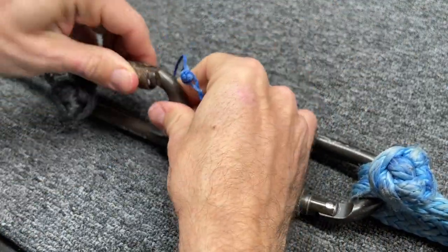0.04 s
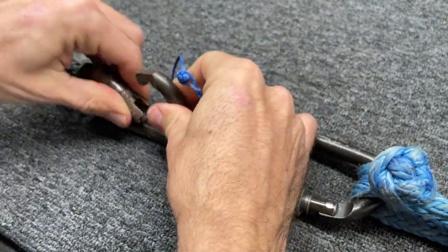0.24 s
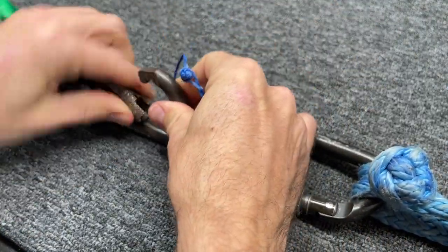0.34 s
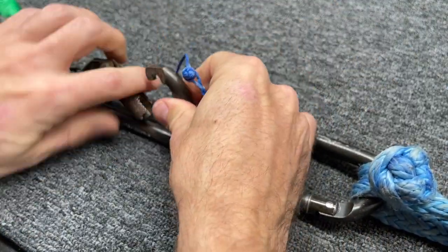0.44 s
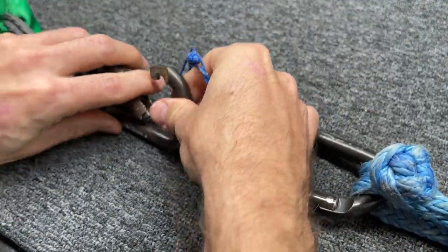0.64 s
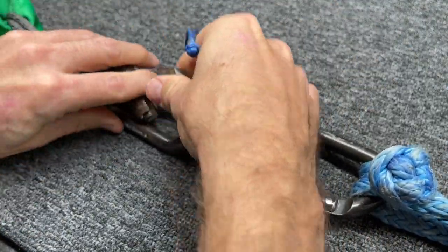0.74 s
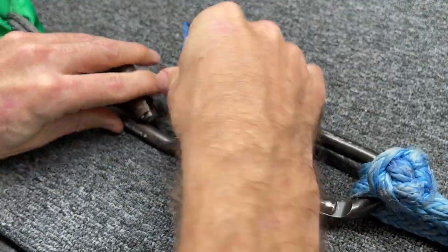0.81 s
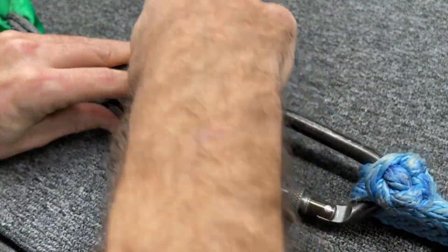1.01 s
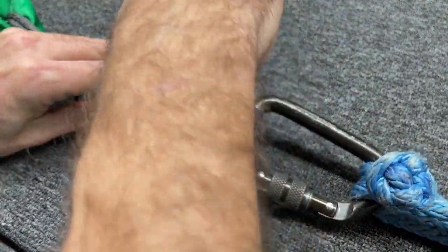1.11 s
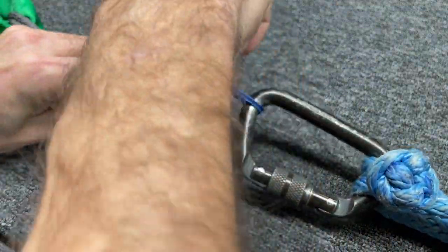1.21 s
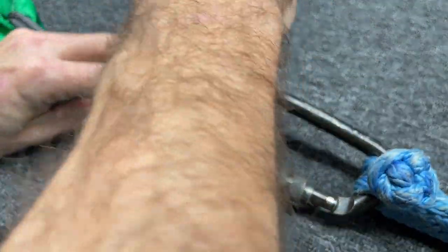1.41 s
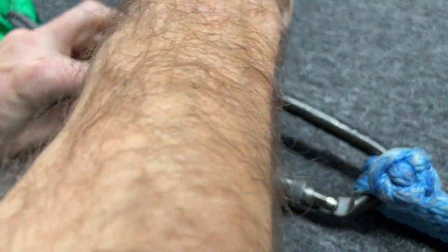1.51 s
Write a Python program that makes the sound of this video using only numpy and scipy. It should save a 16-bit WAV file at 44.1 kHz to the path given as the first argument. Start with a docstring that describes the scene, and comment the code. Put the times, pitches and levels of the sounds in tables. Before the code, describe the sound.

A steel carabiner gate snaps shut, followed by a lighter clack and soft carpet scuffing.

```python
"""A steel carabiner's sprung gate snaps shut, and a lighter clack of steel on steel follows.
Two hands work the carabiners on a carpeted floor, close to the microphone in a quiet, dead room.
The hand damps the ringing steel, and the floor thumps under each blow. Fingers, rope and metal
scuff over the carpet pile with a few tiny ticks, above a low room rumble."""
import sys
import numpy as np
from scipy import signal
from scipy.fft import rfft, irfft
from scipy.io import wavfile
from scipy.ndimage import uniform_filter1d

SR = 44100
rng = np.random.default_rng(int(sys.argv[2]) if len(sys.argv) > 2 else 0)


def dump_mix(stems):
    """Bounce the given channels to the path in sys.argv[1] as a 16-bit WAV at rate SR."""
    frames = np.atleast_2d(stems).T  # one column per channel
    limited = np.clip(frames, -1, 1)  # hard clip at full scale
    pcm = np.round(limited * 32767).astype(np.int16)
    wavfile.write(sys.argv[1], SR, pcm)


N = 68355
BIN_HZ = np.arange(N + 1) * SR / (2 * N)  # the frequencies that the filters work on
GATE_S, CLACK_S = .2105, .3498  # when the two clicks happen
CONTACT_S = .00042  # the ring builds up while the steel faces chatter
RUB_WIDTH = .44  # stereo width of the rubbing

# tone colour of the crack when steel hits steel: f/Hz, level/dB
CRACK_COLOUR = [(300, -9), (900, -6.5), (1400, -16.5), (1900, -11), (2400, -2), (3300, -7.5), (4400, 0.5),
                (5700, -6.5), (8500, 0.5), (10500, -11.5), (12500, -21), (16000, -23)]
# lighter touches have less treble than the gate: f/Hz, gain/dB
LIGHT_TOUCH = [(1000, 6), (1800, 2.5), (2850, 3), (3500, -20), (4300, -0.5), (6200, 2.5), (11000, -1.5),
               (13500, -10)]


def gate_snap():
    """The spring slams the gate shut. Returns the steel's ring and the crack of the hit."""
    # tones of the gate: f/Hz, level/dB, t60/s (t60 is the time to fade by 60 dB)
    tones = [(2228, -17.5, 0.015), (2890, -17.5, 0.007), (3740, -23, 0.0082), (4276, -13.5, .009),
             (4730, -16, .008), (6230, -19, 0.0037), (7530, -6.5, 0.0069), (8300, -29, .03),
             (8610, -25.5, .025), (9160, -32, .045), (9300, -12.5, 0.017), (11600, -21.5, 0.0033),
             (11950, -25.5, 0.017), (14600, -16, 0.0094)]
    return steel(GATE_S, tones), crack(GATE_S, db=-15.5, t60=.015)


def light_clack():
    """Steel hits steel and bounces once. Returns the ring and the double crack."""
    # tones of the clack: f/Hz, level/dB, t60/s
    tones = [(480, -45, .025), (780, -46, .012), (1535, -43.5, 0.021), (2790, -34, 0.017),
             (4350, -32, .011), (5160, -28, 0.0057), (6200, -29.5, 0.0064), (6980, -28, 0.0072),
             (7750, -26.5, .004), (8740, -16, 0.00595), (11300, -34.5, 0.0053)]
    hit = crack(CLACK_S, db=-27, t60=.007)
    bounce = crack(CLACK_S + .0014, db=-31, t60=.007)
    return steel(CLACK_S, tones), shape(hit + bounce, response(LIGHT_TOUCH))


def steel(start, tones):
    """Struck steel rings briefly in the hand; neighbouring tones swing in opposite directions."""
    return sum((-1) ** k * amp(db) * ring(start, hz, t60) for k, (hz, db, t60) in enumerate(tones))


def ring(start, hz, t60):
    """One fading tone of the steel."""
    return fade(start, CONTACT_S, t60) * np.sin(2 * np.pi * hz * since(start))


def crack(start, db, t60):
    """Steel faces chatter as they meet, making a short burst of noise."""
    envelope = fade(start, CONTACT_S, t60)
    burst = even(rng.standard_normal(N) * envelope)
    return amp(db) * coloured(burst, CRACK_COLOUR) * np.sqrt(np.mean(envelope ** 2))


def floor_thumps():
    """The floor answers each blow through the carpet; its lowest tones come last."""
    # tones of the floor: f/Hz, level/dB, t60/s, delay/s
    tones = [(54.6, -8.5, 0.25, 0.014), (91, 5.5, .075, .0085), (232.8, -7.5, 0.044, 0.0071),
             (302.4, 0.5, 0.043, .004), (352, -7, 0.029, 0.00052)]
    # blows on the floor: t/s, level/dB, pitch/ratio, gain of the upper three tones/dB
    blows = [(.126, -36.5, 1.05, -10.5), (.2109, -20.5, 1.003, 3), (0.3493, -32, 1.05, -1.5),
             (0.5759, -47, 1.03, 13.5), (0.5954, -42, 1.08, 3), (.622, -43, 1., 7.5), (1.276, -62, 1.1, 10)]
    out = np.zeros(N)
    for start, db, pitch, upper_db in blows:
        for k, (hz, tone_db, t60, delay) in enumerate(tones):
            gain = amp(db + tone_db + upper_db * (k >= 2))
            swing = np.sin(2 * np.pi * hz * pitch * since(start + delay))
            out -= gain * fade(start + delay, rise=.0037, t60=t60) * swing
    return out


def ticks():
    """Light touches of the gate and sleeve: a bright ring, a lower body ring and a tiny crack."""
    # touches: t/s, level/dB, bright ring f/Hz, t60/s, body ring f/Hz
    touches = [(.0463, -45, 9800, 0.0084, 7670), (.5744, -41, 8600, 0.012, 1280),
               (.589, -36, 8800, 0.0042, 1030), (.625, -37.5, 8240, 0.0082, 1320),
               (.9122, -49, 5700, 0.011, 2560), (1.061, -67, 5640, .018, 2300),
               (1.177, -58, 2320, .0097, 1780), (1.2758, -56, 3370, .005, 2180)]
    grit = amp(-4.5) * shape(noise(CRACK_COLOUR), response(LIGHT_TOUCH))
    out = np.zeros(N)
    for start, db, hz, t60, body_hz in touches:
        body = amp(-11) * ring(start, body_hz, t60=.025)
        out += amp(db) * (ring(start, hz, t60) + body + grit * fade(start, CONTACT_S, t60))
    return out


def lingering_ring():
    """The steel still rings faintly as the hand takes hold."""
    # faint tones: f/Hz, level/dB, t60/s
    tones = [(2980, -70, 0.24), (6220, -59.5, 0.077)]
    return steel(0, tones)


def finger_slide():
    """Fingers slide along the steel and scrape it into ringing."""
    # loudness of the slide: t/s, level/dB
    levels = [(.045, -100), (.08, -65), (.105, -53.5), (.126, -48), (.134, -60), (.15, -57.5),
              (.165, -69.5), (.205, -65), (.23, -110)]
    # its tone colour: f/Hz, level/dB
    colour = [(300, -6.5), (2600, -4.5), (6500, 0.5), (9700, 5), (10800, -7), (15500, -12), (16500, -26)]
    # pitches where the steel rings along: f/Hz, width/Hz, boost/dB
    peaks = [(1820, 630, 12.5), (3620, 360, 7), (5330, 260, 4), (8300, 670, 7.5), (12600, 800, 8.5),
             (15000, 600, 7)]
    return rub(levels, colour, flutter_db=2.5, peaks=peaks)


def squeaks():
    """Skin catches on the steel for a moment and gives a thin squeak."""
    # catches: t/s, level/dB, f/Hz, rise/s, t60/s
    catches = [(.064, -50.5, 8263, 0.0077, .22), (0.109, -48.5, 15180, 0.0028, 0.075)]
    return sum(amp(db) * np.sin(wavering_phase(hz, wobble=.02, rate=1700)) * fade(start, rise, t60)
               for start, db, hz, rise, t60 in catches)


def skin_rasp():
    """Skin sticks and slips on the steel just before letting go: a rough stack of seven tones."""
    # average loudness of each tone: t/s, level/dB
    levels = [(.09, -100), (.11, -70.5), (.127, -56), (.135, -71.5), (.19, -110)]
    phase = wavering_phase(1800, wobble=.06, rate=1500)
    return curve(levels) * sum((1 + .5 * wander(400)) * np.sin(k * phase) for k in range(1, 8))


def carpet_brush():
    """Hand and rope brush over the carpet."""
    # loudness of the brushing: t/s, level/dB
    levels = [(0, -61.5), (.026, -65.5), (.04, -73.5), (.45, -79), (.52, -61), (.555, -49.5), (.6, -55),
              (.65, -56.5), (.69, -62.5), (.77, -83.5), (.85, -82), (.92, -68.5), (.958, -68.5), (.99, -99),
              (1.175, -73), (1.21, -89), (1.55, -80.5)]
    # its tone colour: f/Hz, level/dB
    colour = [(290, -32.5), (500, -6), (655, -16), (976, -7.5), (1110, -10), (2100, -11), (5230, -9),
              (7260, -13.5), (8490, -2.5), (11300, -13), (15000, -73)]
    return rub(levels, colour, flutter_db=1.85)


def rub(levels, colour, flutter_db, peaks=()):
    """Rubbing is thousands of tiny, uneven slips a second; it swells with the speed of the hand."""
    slips_per_s, size_spread_db = 8400, .5
    body = amp(sum(db / (1 + (2 * (BIN_HZ - hz) / width) ** 2) for hz, width, db in peaks))

    def slips():
        sizes = amp(size_spread_db * np.minimum(rng.exponential(size=N), 5)) * rng.standard_normal(N)
        slipping = rng.random(N) < slips_per_s / SR
        return coloured(shape(sizes * slipping, body), colour)
    return spread(slips(), slips(), RUB_WIDTH) * curve(levels) * amp(flutter_db * wander(160))


def scuffs():
    """Short pushes of steel over the carpet, each a puff of rubbing noise."""
    # pushes: t/s, level/dB, centre f/Hz, rise/s, t60/s
    pushes = [(.574, -59.5, 610, 0.0078, 0.17), (0.621, -48.5, 543, 0.001, 0.034),
              (0.871, -63.5, 2950, 0.0054, 0.053), (0.919, -56, 386, 0.016, 0.15),
              (0.941, -63.5, 830, .006, 0.094), (1.11, -62, 500, 0.0082, 0.078),
              (1.154, -51, 1870, 0.021, 0.08), (1.2764, -56.5, 610, 0.0014, 0.026)]
    out = np.zeros(N)
    for start, db, hz, rise, t60 in pushes:
        hump = [(hz / 16, -48), (hz, 0), (hz * 16, -48)]  # falls 12 dB per octave on both sides
        out += amp(db) * noise(hump) * fade(start, rise, t60)
    return out


def carpet_drag():
    """The carabiner drags dully over the carpet, sticking and slipping as it is pushed away."""
    # loudness of the drag: t/s, level/dB
    levels = [(.05, -70), (.12, -51.5), (.19, -58), (.27, -49), (.39, -50), (.45, -62), (.56, -65),
              (.595, -47.5), (.645, -45.5), (.72, -63), (.8, -78), (1., -64), (1.33, -76)]
    # its tone colour: f/Hz, level/dB
    colour = [(30, -28.5), (52, -3), (90, 3.5), (130, -2), (160, -3.5), (190, -11), (235, -2.5),
              (320, -5.5), (420, -19.5), (700, -26), (4000, -70.5)]
    # loudness of the low stick-and-slip shudder: t/s, level/dB
    shudder_levels = [(.56, -60.5), (.595, -49), (.65, -43.5), (.675, -44.5), (.698, -35), (.725, -50),
                      (.76, -70.5)]
    scrape = noise(colour) * curve(levels)
    shudder = np.sin(wavering_phase(90, wobble=.1, rate=28)) * curve(shudder_levels)
    return scrape + shudder


def room_echo(rings):
    """Both clicks spread all round and bounce off nearby surfaces; the rings add a little colour."""
    # tone colour of the echo: f/Hz, level/dB
    colour = [(100, -3.5), (400, 2), (700, -6), (1200, -11.5), (2300, 3.5), (3250, -4.5), (4400, 1.5),
              (5800, -4.5), (7000, -5.5), (8400, 1.5), (9700, 1), (10400, -9.5), (13000, -32.5)]
    gate = amp(10) * signal.unit_impulse(N, int(GATE_S * SR))
    clack = amp(-3) * signal.unit_impulse(N, int(CLACK_S * SR))
    sent = gate + clack + amp(-13.5) * rings

    def scatter(db, t60):
        burst = even(rng.standard_normal(N) * fade(start=.0013, rise=.0061, t60=t60))
        return amp(db) * coloured(burst, colour) / np.sqrt(N)
    # quick early echoes plus a faint tail
    mid, side = (scatter(db=-28, t60=.029) + scatter(db=-25.5, t60=.27) for _ in range(2))
    return signal.fftconvolve(sent[None], spread(mid, side, width=.26), axes=1)[:, :N]


def room_rumble():
    """The room rumbles low, with a trace of hiss; the sound is wider towards the treble."""
    # tone colour of the rumble: f/Hz, level/dB
    colour = [(20, -38), (35, -19), (57, 6), (80, -5.5), (120, -2.5), (170, -15.5), (500, -35.5),
              (1000, -41), (7000, -54), (9200, -45), (12300, -56.5), (13200, -68.5), (17000, -74.5)]
    # the part that is opposite in left and right: f/Hz, gain/dB
    side_gain = [(60, -21.5), (250, -7.5), (1000, -2.5)]
    mid = noise(colour)
    side = shape(noise(colour), response(side_gain))
    return amp(-57) * np.sqrt(2) * spread(mid, side, width=.99)


def place_left(x, lean):
    """Make a sound louder on the left, and a hair earlier there."""
    # left minus right, before scaling by lean: f/Hz, level/dB
    balance = [(100, 0.37), (200, 4), (350, 4), (800, 2), (1300, 5.5), (2400, 9), (4400, 5.5), (7000, 7.5),
               (8700, 0.2), (15000, 2)]
    # how far the left side is ahead: f/Hz, phase/rad
    head_start = [(100, .045), (500, 1), (3000, .8), (4000, .15), (5500, 0.54), (6500, .3), (9400, 1.5),
                  (15000, 2.1)]
    lead = np.interp(BIN_HZ, *np.array(head_start).T)
    left = response(balance) ** (lean / 2) * np.exp(.5j * lead)
    return shape(x, np.array([left, 1 / left]))


def spread(mid, side, width):
    """Left and right from a shared part and an opposite part."""
    return (mid + width * side * np.array([[1], [-1]])) / np.hypot(1, width)


def amp(db):
    """Turn decibels into a gain."""
    return 10 ** (np.asarray(db) / 20)


def since(start):
    """Seconds since a moment, zero before it."""
    return np.maximum(np.arange(N) / SR - start, 0)


def fade(start, rise, t60):
    """Rise smoothly, then die away by 60 dB every t60 seconds."""
    t = since(start)
    return (1 - np.exp(-(t / rise) ** 2)) * np.exp(-np.log(1000) * t / t60)


def curve(points):
    """Gain over time from points of t/s, level/dB."""
    return amp(np.interp(since(0), *np.array(points).T))


def response(points):
    """Gain at each frequency from points of f/Hz, level/dB."""
    hz, db = np.array(points).T
    return amp(np.interp(np.log(BIN_HZ + 1), np.log(hz), db))


def shape(x, gain):
    """Filter a sound with one gain for each frequency."""
    return irfft(rfft(x, 2 * N) * gain)[..., :N]


def coloured(x, colour):
    """Give a sound a tone colour and a typical size of 1."""
    y = shape(x, response(colour))
    return y / y.std()


def noise(colour):
    """Steady noise with a tone colour."""
    return coloured(rng.standard_normal(N), colour)


def even(x, smooth_hz=500):
    """Level out the broad chance peaks in a burst's spectrum."""
    power = uniform_filter1d(np.abs(rfft(x, 2 * N)) ** 2, size=int(smooth_hz * 2 * N / SR))
    return shape(x, power ** -.5)


def wander(rate):
    """A random drift of typical size 1 that turns about `rate` times a second."""
    hold = int(SR / rate)
    steps = np.repeat(rng.standard_normal(N // hold + 1), hold)
    drift = uniform_filter1d(steps, hold)[:N]
    return drift / drift.std()


def wavering_phase(hz, wobble, rate):
    """Phase of a stick-and-slip tone whose pitch drifts by about the fraction `wobble`."""
    return 2 * np.pi * np.cumsum(hz * (1 + wobble * wander(rate))) / SR


def scene():
    """Steel, floor and rubbing, left of centre, over the room's echo and rumble."""
    clack_ring, clack_crack = light_clack()
    gate_ring, gate_crack = gate_snap()
    rings = gate_ring + clack_ring + lingering_ring() + ticks() + floor_thumps()
    rubs = finger_slide() + carpet_brush() + spread(scuffs(), scuffs(), RUB_WIDTH)
    rubs += squeaks() + skin_rasp()
    direct = rings + gate_crack + clack_crack + carpet_drag()
    room = room_echo(rings) + room_rumble()
    return place_left(direct, lean=.94) + place_left(rubs, lean=.44) + place_left(room, lean=.45)


def record(dry):
    """Drop the deepest bass and cut the highest treble."""
    low_cut = signal.butter(2, 32, "high", fs=SR, output="sos")
    top_cut = signal.ellip(8, .2, 80, 16500, fs=SR, output="sos")
    return signal.sosfilt(top_cut, signal.sosfilt(low_cut, dry))


dry = scene()
out = record(dry)
dump_mix(out)
```